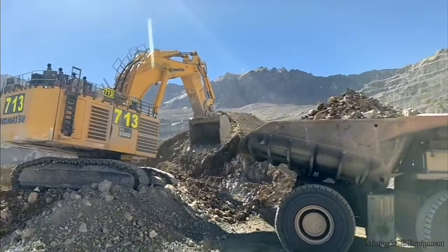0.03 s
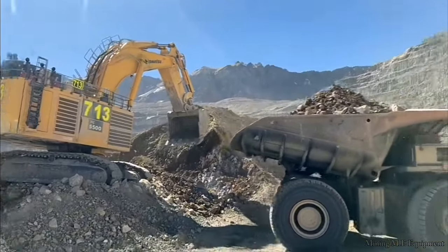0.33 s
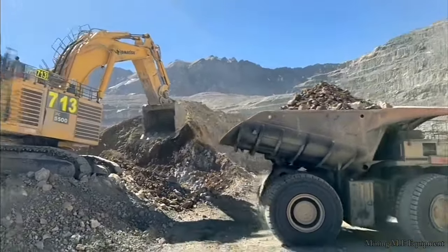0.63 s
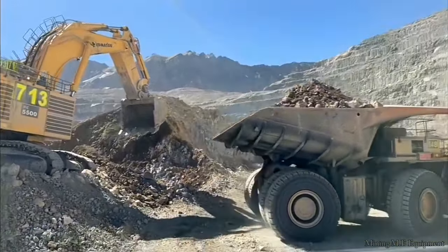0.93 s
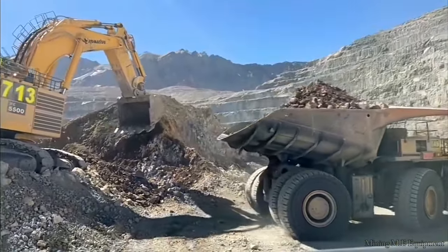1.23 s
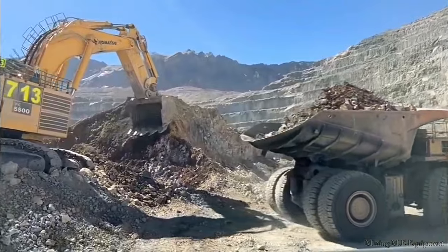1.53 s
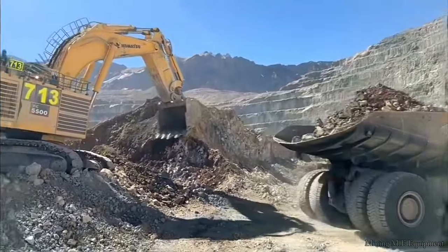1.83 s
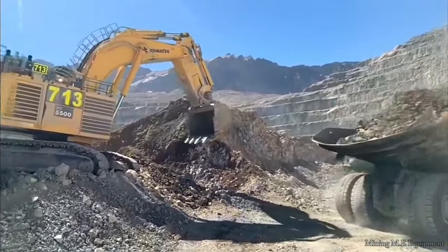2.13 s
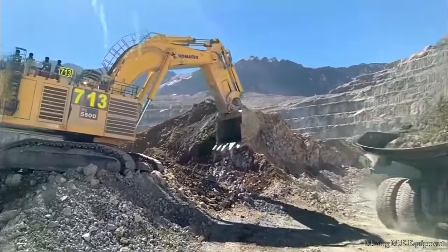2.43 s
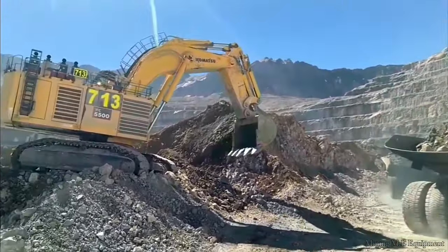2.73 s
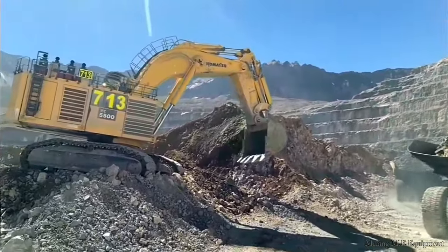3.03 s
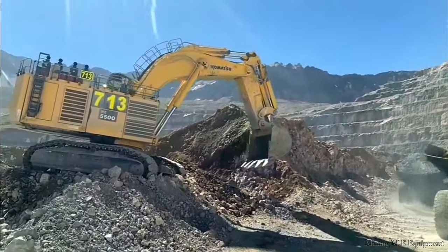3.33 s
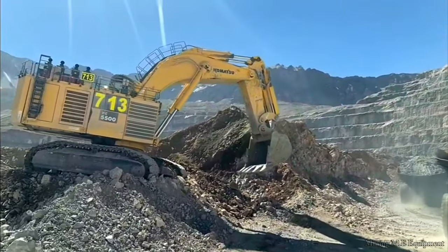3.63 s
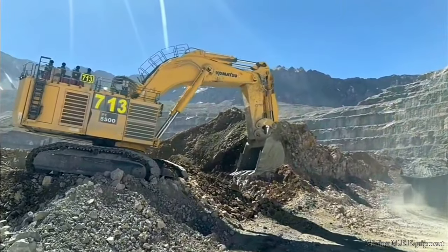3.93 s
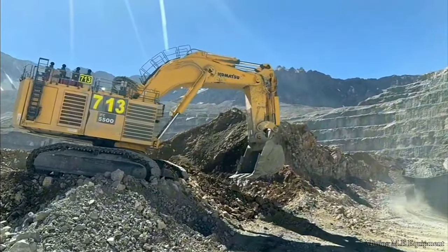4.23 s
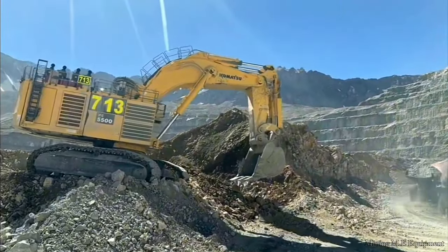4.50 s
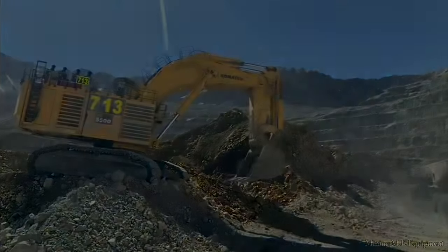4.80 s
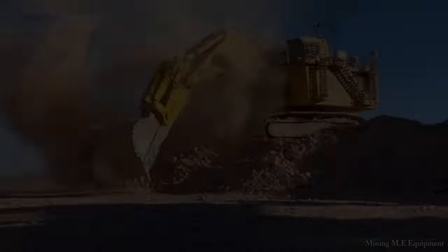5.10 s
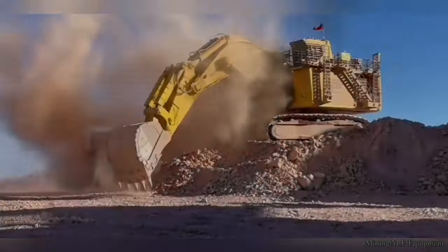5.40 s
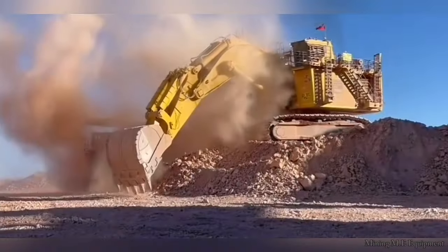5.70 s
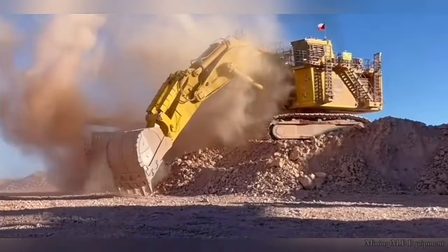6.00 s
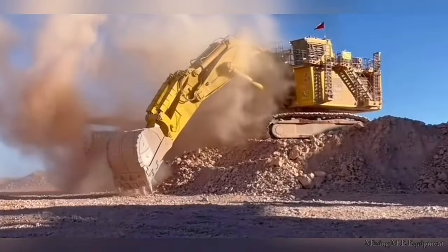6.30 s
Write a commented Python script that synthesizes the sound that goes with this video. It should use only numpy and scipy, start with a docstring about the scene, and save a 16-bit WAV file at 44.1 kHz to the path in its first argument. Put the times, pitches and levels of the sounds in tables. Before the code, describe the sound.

From the start, a large excavator's diesel and cooling fan drone steadily near the microphone in an open-pit mine, over a deep, centred exhaust rumble. The engine sags slightly under load and beats against a haul truck's engine and a humming pump. A dry metal joint gives faint, high chirps in short bouts throughout. A broad roar of air and tyres swells gently as the truck passes, peaking around 3 seconds and then turning a little duller, with brief low growls near 2.4 and 3.7 seconds. At about 5 seconds the sound cuts abruptly, with a tiny tick, to a shovel digging. Loose rock rushes and rattles wide in stereo, growing slightly over a steady diesel rumble. Hydraulics whine in short surges, stones squeal briefly on the steel bucket, and a motor gives a short rising moan around 6 seconds, just before the end.

```python
"""An excavator's diesel and cooling fan drone at the microphone in an open pit, over a deep exhaust rumble.
They beat against a haul truck's engine; a broad roar swells as the truck comes near, and a dry joint
squeaks with the firing. After five seconds the scene changes to a shovel digging: the truck is gone,
sliding rock rushes wide across the stereo pair, hydraulics whine and stones squeal on the bucket."""
import sys
import numpy as np
from scipy import signal
from scipy.fft import rfft, irfft
from scipy.io import wavfile
from scipy.ndimage import uniform_filter1d, minimum_filter1d

SR = 44100
rng = np.random.default_rng(int(sys.argv[2]) if len(sys.argv) > 2 else 0)


def output_pcm(signal):
    """Save a mono or channel-first signal as 16-bit PCM at the path in sys.argv[1].

    Samples are clipped to [-1, 1] before scaling.
    """
    pcm = np.clip(np.atleast_2d(signal).T, -1, 1) * 32767
    wavfile.write(sys.argv[1], SR, np.round(pcm).astype(np.int16))


N = 280035
CHANGE_S = 5.035  # from the excavator and truck to the shovel


# the excavator's exhaust lines: (multiple of the engine cycle, level re the fifth [dB])
EXHAUST_ORDERS = [(3, -23), (4, -7), (5, 0), (7, -13.5), (8, -11.5)]
# loads dragging the diesel down: (time [s], half length [s], sag of the exhaust note [Hz])
DIESEL_LOADS = [(0, 0.24, 2.3), (1.585, 0.3, 3.8), (3.01, 0.17, 1.46), (4.742, 0.49, 3.435)]
# brief fades of the exhaust at the microphone: (time [s], gain [dB])
EXHAUST_FADES = [(0, -5), (1.03, -4), (2.38, -18), (3.48, -16)]
def diesel(t, exhaust_hz=76.55, load_db_per_hz=0.43):
    """Unequal firings give lines on multiples of the engine cycle; load slows them and makes them louder."""
    sag_hz = bumps(t, DIESEL_LOADS)
    cycle = np.cumsum(exhaust_hz - sag_hz) / SR / 5  # the exhaust note is the fifth line
    fades_db = bumps(t, [(s, 0.053, depth) for s, depth in EXHAUST_FADES])
    db = -13 + load_db_per_hz * sag_hz + walk(0.9) + fades_db
    lines = sum(tone(k * cycle, db + rel, waver_db=0.5, waver_rad=0.15) for k, rel in EXHAUST_ORDERS)
    return lines, cycle


# slow sags of the excavator's fan: (time [s], half length [s], sag [Hz])
FAN_SAGS = [(2.05, 0.42, 4.6), (2.795, .3, 5), (4.956, 0.357, 2.66)]
# fades and swells of its note at the microphone: (time [s], half length [s], gain [dB])
FAN_FADES = [(1.448, 0.32, -3.5), (2.402, 0.078, 4), (3.144, 0.053, 5.5), (3.699, .12, 1.5),
             (4.3, .25, -2.5)]
def fan(t, blade_hz=170.84):
    """The cooling fan's blade note sags and recovers, a little quieter while the truck is near."""
    hz = blade_hz - bumps(t, FAN_SAGS)
    db = -15.5 - 0.8 * nearness(t) + bumps(t, FAN_FADES)
    return tone(np.cumsum(hz) / SR, db, waver_db=0.65, waver_rad=0.2)


# the excavator's exhaust noise: (frequency [Hz], density [dB per Hz])
RUMBLE_SPECTRUM = [(20, -60), (33, -53), (46, -40), (65, -44), (92, -43), (114, -40), (143, -36.5),
                   (168, -36), (190, -40.5), (215, -44), (250, -51.5), (400, -84), (1000, -120)]
def rumble():
    """The exhaust rumbles deep and steady, dead centre."""
    return noise(colour(RUMBLE_SPECTRUM))


# the haul truck's engine lines: (multiple of the engine cycle, level [dB])
TRUCK_ORDERS = [(3, -30.5), (4, -25), (5, -20), (7, -27.5)]
# the hydraulic pump's lines, truck far off: (multiple of the pump cycle, level [dB])
PUMP_ORDERS = [(4, -27.5), (5, -37), (10, -37.5), (16, -34), (25, -40), (40, -48)]
# other hums in the pit, truck far off: (pitch [Hz], level [dB], phase waver [rad])
HUMS = [(178, -24.5, .25), (233.8, -34, 0.42), (354, -32.5, 2.2), (1255, -43, 0.71), (1960, -49, 2.2)]
def steady_machines(t, truck_hz=15.75, pump_hz=43.45, near_db=2):
    """Truck engine, pump and hums hold their speed and beat with the excavator; a hoarse whine wavers."""
    truck = sum(tone(k * truck_hz * t, db, waver_db=2, waver_rad=0.21) for k, db in TRUCK_ORDERS)
    pump = sum(tone(k * pump_hz * t, db, waver_db=2.5, waver_rad=0.34) for k, db in PUMP_ORDERS)
    hums = sum(tone(hz * t, db, waver_db=1.5, waver_rad=rad) for hz, db, rad in HUMS)
    hoarse = noise(hump(826, width_hz=23)) * undb(-50 + 2 * walk(3))
    return truck + (pump + hums + hoarse) * undb(near_db * nearness(t))


PASS_S, PASS_HALF_S = 2.9, 1.2
def nearness(t):
    """How near the truck is to the microphone: 1 as it goes by, 0 far away."""
    return 1 / (1 + ((t - PASS_S) / PASS_HALF_S) ** 4)


# the machines' roar across the pit: (frequency [Hz], base density [dB per Hz])
ROAR_SPECTRUM = [(150, -58), (280, -46), (400, -47), (520, -44.5), (960, -49.5), (1150, -56), (1320, -55),
                 (1600, -57.5), (2600, -65.5), (4700, -73.5), (4920, -83.5), (5120, -75.5), (5800, -74),
                 (6400, -75.5), (6530, -80), (6700, -78.5), (7800, -82.5), (9000, -95), (13000, -99)]
# its width at the stereo pair: (frequency [Hz], side minus mid [dB])
ROAR_WIDTH = [(150, -60), (230, -47), (340, -44), (600, -20.5), (2000, -19), (3800, -11.5), (7000, -5)]
# its brief surges: (time [s], half length [s], gain [dB])
ROAR_SURGES = [(0, 0.071, 1.5), (1.542, 0.058, 1), (2.552, 0.35, 0.5), (3.71, 0.13, 1)]
def roar(t):
    """Radiator air, tyres and clatter swell as the truck passes; a faint sizzle and whistle lie on top."""
    db = -0.79 + 1.5 * nearness(t) + bumps(t, ROAR_SURGES)
    treble_db = 1.3 - 0.54 * np.clip(t - PASS_S, 0, 1)  # duller once the truck has gone by
    mid = rush(colour(ROAR_SPECTRUM), treble_db, flicker_db=0.36, flicker_rate=9.2, flutter_db=0.85)
    side = noise(colour(ROAR_SPECTRUM) * colour(ROAR_WIDTH))
    air = stereo(mid, side) * undb(db + 0.06 * walk(15))
    band = hump(10920, width_hz=980)
    sizzle = stereo(noise(band), noise(band) * undb(-6)) * undb(-79.5 + db / 2 + walk(18))
    whistle = tone(9819 * t, -58, waver_db=4, waver_rad=0.2)
    return air + sizzle + whistle


# rock sliding at the shovel's bucket: (frequency [Hz], base density [dB per Hz])
ROCK_SPECTRUM = [(30, -68), (60, -44), (150, -56), (240, -45.5), (330, -45.5), (420, -51.5), (560, -50),
                 (700, -53.5), (850, -49.5), (1200, -55), (1750, -55), (2030, -58), (2450, -58),
                 (2900, -60), (3250, -64.5), (3650, -63.5), (4080, -70.5), (4500, -68), (4860, -76.5),
                 (5130, -70), (5800, -73.5), (6250, -73), (6550, -77), (7400, -83), (9300, -86),
                 (12500, -103)]
# slips in the flow: (time [s], half length [s], gain [dB])
SLIPS = [(5.245, .014, 1), (5.362, .04, 0.1), (5.467, 0.033, -1), (5.75, 0.032, -0.5), (5.92, 0.066, 1.2),
         (6.2, .035, 1.2)]
def rock(t, growth_db_per_s=0.84, rise_s=0.041):
    """Loose rock pours ever faster around the bucket: a rush of fines with stones rattling in it."""
    age = np.maximum(t - CHANGE_S, 0)
    db = -0.5 + growth_db_per_s * age - 2.5 * np.exp(-age / rise_s) + bumps(t, SLIPS)
    fines = rush(colour(ROCK_SPECTRUM), treble_db=0.03, flicker_db=0.87, flicker_rate=19.5, flutter_db=0.22)
    return (fines + stones(t)) * undb(db)


def stones(t, per_s=260, low_hz=1110, high_hz=4950, t60_s=0.022):
    """Stones knock together at random, each at its own pitch, with the dull colour of the whole flow."""
    knocks, age = np.zeros(2 * N), t[:SR // 20]
    for when, pitch, size in rng.random((int(per_s * N / SR), 3)):
        hz = low_hz * (high_hz / low_hz) ** pitch
        size_db = 3.5 * min(-np.log(size), 4)  # many small stones, few large
        start = int(when * N)
        knocks[start:start + len(age)] += undb(size_db - 60 * age / t60_s) * np.sin(2 * np.pi * hz * age)
    crunch = irfft(rfft(knocks[:N]) * colour(ROCK_SPECTRUM), N)
    return crunch * undb(-32) / crunch.std()


# the shovel's exhaust lines: (multiple of the engine cycle, level [dB])
SHOVEL_ORDERS = [(4, -24), (5, -14), (7, -27.5)]
# its cooling fan: (time [s], blade note [Hz], level [dB])
SHOVEL_FAN = [(5.05, 167.3, -18), (5.3, 167.4, -15.5), (5.47, 166.6, -25.5), (5.75, 168.5, -21),
              (5.87, 169, -17), (6.35, 170.3, -17)]
# its exhaust rumble: (frequency [Hz], starting density [dB per Hz])
SHOVEL_RUMBLE = [(20, -66), (36, -57), (50, -40.5), (100, -37), (140, -41.5), (210, -43), (260, -53),
                 (400, -84), (1000, -120)]
def shovel_engine(t, exhaust_hz=74, rumble_db_per_s=-2):
    """The shovel's diesel holds its speed while its rumble eases and its fan picks up."""
    cycle = exhaust_hz * t / 5
    exhaust = sum(tone(k * cycle, db, waver_db=0.3, waver_rad=0.11) for k, db in SHOVEL_ORDERS)
    when, hz, db = np.transpose(SHOVEL_FAN)
    blade_turns = np.cumsum(np.interp(t, when, hz)) / SR
    blades = tone(blade_turns, np.interp(t, when, db), waver_db=0.5, waver_rad=0.1)
    easing = undb(rumble_db_per_s * np.maximum(t - CHANGE_S, 0))
    return exhaust + blades + noise(colour(SHOVEL_RUMBLE)) * easing


# the shovel's pump lines: (pitch [Hz], resting level [dB])
WHINE_LINES = [(826, -34.5), (1700, -45), (2128, -46)]
# surges of the lowest line: (time [s], half length [s], gain [dB])
WHINE_SURGES = [(5.31, .025, 7), (5.583, 0.05, 10), (5.872, .025, 5), (6.1, 0.021, 9)]
def whine(t):
    """The shovel's hydraulics whine on several lines; the lowest surges as the bucket bites."""
    clock = np.cumsum(1 + 0.0053 * walk(25)) / SR  # the pitches wander together
    lowest, *upper = [tone(hz * clock, db, waver_db=1.1, waver_rad=0.22) for hz, db in WHINE_LINES]
    return lowest * undb(bumps(t, WHINE_SURGES)) + sum(upper)


def moan(t, peak_s=6.05, rise_hz_per_s=55):
    """A hydraulic motor speeds up as the bucket lifts, swelling and fading as its pitch rises."""
    hz = 258 + rise_hz_per_s * (t - peak_s)
    swell = bumps(t, [(peak_s, 0.12, 1)])
    return tone(np.cumsum(hz) / SR, -25.5, waver_db=-2, waver_rad=0.3) * swell


# squeals at the bucket: (time [s], half length [s], pitch [Hz], level [dB])
SCRAPES = [(5.25, .012, 1790, -32), (5.33, .035, 1720, -31), (5.55, .018, 3670, -38),
           (5.715, .014, 3460, -38), (5.925, .011, 2930, -33), (5.953, .008, 2350, -32),
           (6.063, 0.01, 2490, -25), (6.17, .016, 1850, -32), (6.225, .012, 2180, -26),
           (6.247, 0.0083, 2900, -30)]
def scrapes(t, overtone=3.3, overtone_db=-17.5):
    """Stones dragged over the bucket steel give short, rough squeals with a thin upper ring."""
    angle = 2 * np.pi * np.cumsum(1 + 0.0077 * walk(93)) / SR
    squeals = 0
    for s, half, hz, db in SCRAPES:
        ring = np.sin(hz * angle) + undb(overtone_db) * np.sin(overtone * hz * angle)
        squeals += np.sqrt(2) * ring * bumps(t, [(s, half, db)], undb)
    return squeals


# bouts of squeaking, in both scenes: (time [s], half length [s], level [dB], pitch shift [Hz])
SQUEAKS = [(.08, 0.032, -36.5, -0.5), (.25, 0.061, -39, 19.5), (.84, .075, -34, -20),
           (1.19, .04, -41, 40.5), (1.295, 0.037, -30.5, 30), (1.493, 0.013, -32, 29.5),
           (1.696, .025, -35, 9), (1.83, .07, -38, 90.5), (1.99, 0.046, -35, 21), (2.07, 0.041, -37, -2.5),
           (2.694, 0.032, -36, 1.5), (2.98, 0.0255, -36, -23.5), (3.309, 0.019, -32, -32),
           (3.551, 0.0407, -35, -71), (4.14, 0.044, -37, 59.5), (5.2, 0.057, -38.5, 0), (6.28, .07, -39, 0)]
def squeak(t, cycle, ring_hz=6190):
    """A dry metal joint shaken by the engine chirps unevenly, four times a cycle, in short bouts."""
    bouts = bumps(t, [(s, half, db) for s, half, db, _ in SQUEAKS], undb)
    shift_hz = bumps(t, [(s, half, shift) for s, half, _, shift in SQUEAKS])
    hz = ring_hz + shift_hz + 70 * walk(224)
    ring = np.sqrt(2) * np.sin(2 * np.pi * np.cumsum(hz) / SR)
    contact = np.sin(4 * np.pi * cycle + 0.59 * walk(33)) ** 2
    chirps = ring * contact * undb(2.2 * walk(40))
    floor = undb(-49 + 4.3 * walk(13))  # faint chatter between bouts
    rubbing = noise(hump(ring_hz, width_hz=196)) * undb(-73.5)
    return chirps * np.hypot(bouts, floor) + rubbing


# growls in the background of both scenes: (time [s], half length [s], density [dB per Hz])
GROWLS = [(2.43, 0.06, -43), (3.68, 0.072, -44.5), (6.07, 0.063, -49)]
def growl(t):
    """A low band of noise swells out of the din now and then."""
    return noise(hump(320, width_hz=104)) * bumps(t, GROWLS, undb)


# short echoes that widen the digging: (lag [s], gain [dB])
ECHOES = [(.0125, -10), (.0153, -8), (.0203, -2), (.0252, -9), (.0278, -13)]
# their colour in the side channel: (frequency [Hz], gain [dB])
ECHO_COLOUR = [(60, -1), (250, -4.5), (550, 2), (1800, -4.5), (2150, -14), (3000, -12.5), (3500, -3.5),
               (6000, -5.5), (7500, -21), (9000, -9), (11000, -21)]
# where the rock lies from the microphone: (frequency [Hz], left minus right [dB])
ROCK_BALANCE = [(200, -16), (350, -7), (650, -2.5), (2000, -0.5)]
def spread(x):
    """Close echoes reach left and right with opposite sign and widen the sound; the lows lean right."""
    echoes = sum(undb(db) * np.roll(x, int(lag * SR)) for lag, db in ECHOES)
    left, right = stereo(rfft(x), rfft(echoes) * colour(ECHO_COLOUR))
    lean = np.sqrt(colour(ROCK_BALANCE))
    return irfft(np.array([left * lean, right / lean]), N)


def tone(turns, db, waver_db, waver_rad):
    """A line whose level and phase waver on its way through moving air to the microphone."""
    phase = 2 * np.pi * (turns + rng.random()) + waver_rad * walk(2.66)
    return np.sqrt(2) * undb(db + waver_db * walk(2)) * np.sin(phase)


def rush(gain, treble_db, flicker_db, flicker_rate, flutter_db):
    """Noise in overlapping octave bands, each flickering on its own while all flutter together."""
    octave, bands = np.log2(np.fft.rfftfreq(N, 1 / SR) + 1), 0
    for centre in range(6, 15):  # 64 Hz to 16 kHz
        band = noise(gain * np.sqrt(np.clip(1 - abs(octave - centre), 0, 1)))
        treble_share = np.clip((centre - 9) / 2, 0, 1)
        bands += band * undb(flicker_db * walk(flicker_rate) + treble_db * treble_share)
    return bands * undb(flutter_db * walk(17.6))


def noise(gain):
    """Noise with the given amplitude per root hertz."""
    return irfft(rfft(rng.standard_normal(N)) * gain, N) * np.sqrt(SR / 2)


def walk(rate):
    """Smooth random drift of spread 1 that changes about rate times a second."""
    x = noise(hump(0, rate))
    return (x - x.mean()) / x.std()


def colour(points):
    """Gain at each frequency from rows of (frequency [Hz], level [dB])."""
    hz, db = np.transpose(points)
    return undb(np.interp(np.log(np.fft.rfftfreq(N, 1 / SR) + 1), np.log(hz), db))


def hump(hz, width_hz):
    """Gain at each frequency of a steep-sided band."""
    return 1 / (1 + ((np.fft.rfftfreq(N, 1 / SR) - hz) / width_hz) ** 4)


def bumps(t, table, size=np.asarray):
    """Smooth rises and falls from rows of (time [s], half length [s], size)."""
    return sum(size(top) * np.exp(-0.5 * ((t - s) / half) ** 2) for s, half, top in table)


def stereo(mid, side):
    """Left and right from mid and side."""
    return np.array([mid + side, mid - side])


def undb(db):
    """Decibels to gain."""
    return 10 ** (np.asarray(db) / 20)


def scene():
    """Excavator and truck give way abruptly, with a tiny tick and a brief dip, to a shovel digging."""
    t = np.arange(N) / SR
    after = 1.0 * (t >= CHANGE_S)
    exhaust, cycle = diesel(t)
    hauling = exhaust + fan(t) + rumble() + roar(t) + steady_machines(t)
    dip = undb(after * bumps(t, [(CHANGE_S + 0.024, 0.024, -10)]))
    digging = shovel_engine(t) * dip + spread(rock(t) + whine(t) + moan(t) + scrapes(t))
    tick = rng.standard_normal(N) * bumps(t, [(CHANGE_S, 0.00031, -16)], undb)
    return (1 - after) * hauling + after * digging + squeak(t, cycle) * dip + growl(t) + tick


def record(dry, top_hz=12800):
    """Behind the microphone a fast limiter holds the peaks at full scale and a low-pass cuts the top."""
    trimmed = dry * undb(-0.4)
    peak = np.maximum(1, abs(trimmed).max(axis=0))
    gain = minimum_filter1d(1 / peak, size=181)
    gain = uniform_filter1d(uniform_filter1d(gain, size=91), size=91)
    return signal.sosfilt(signal.ellip(8, 0.2, 70, top_hz, fs=SR, output="sos"), trimmed * gain)


dry = scene()
out = record(dry)
output_pcm(out)
```